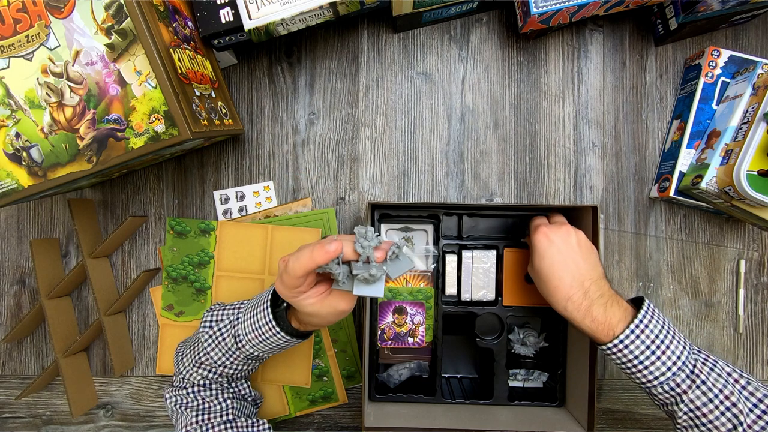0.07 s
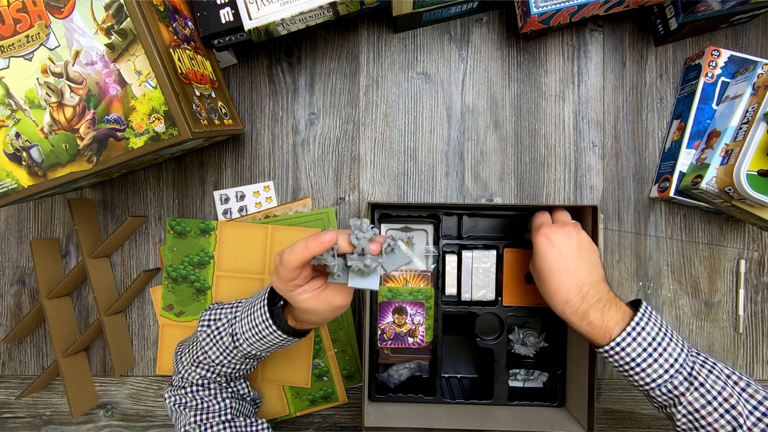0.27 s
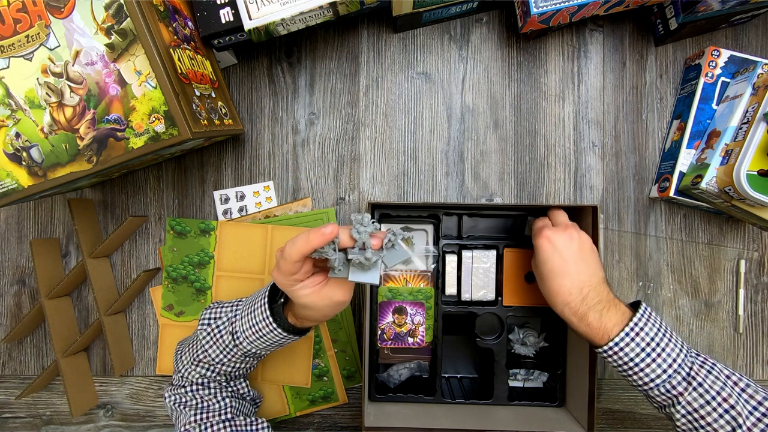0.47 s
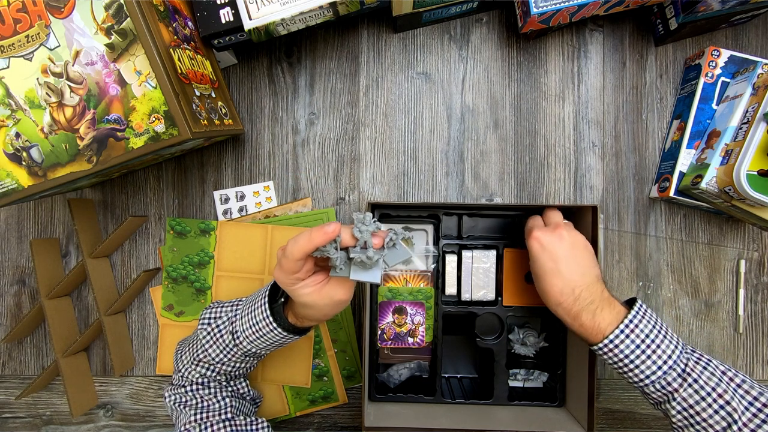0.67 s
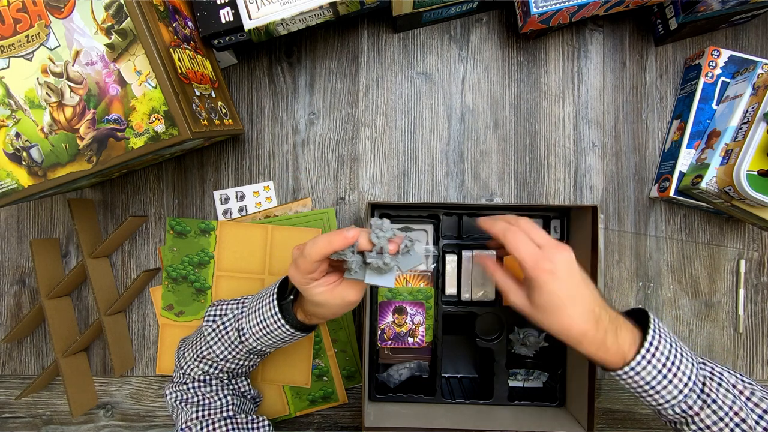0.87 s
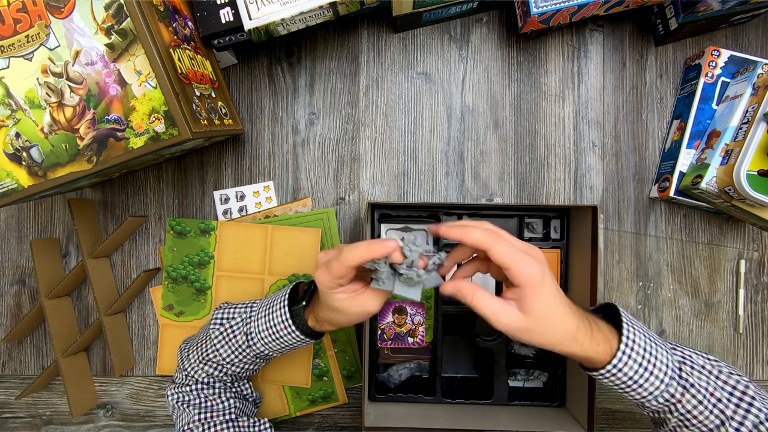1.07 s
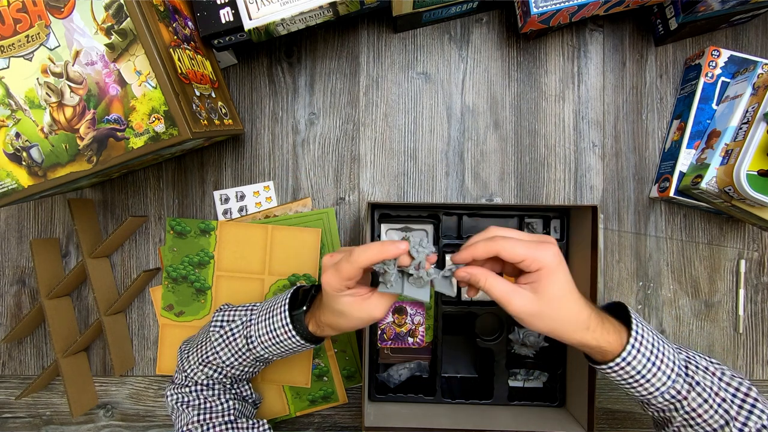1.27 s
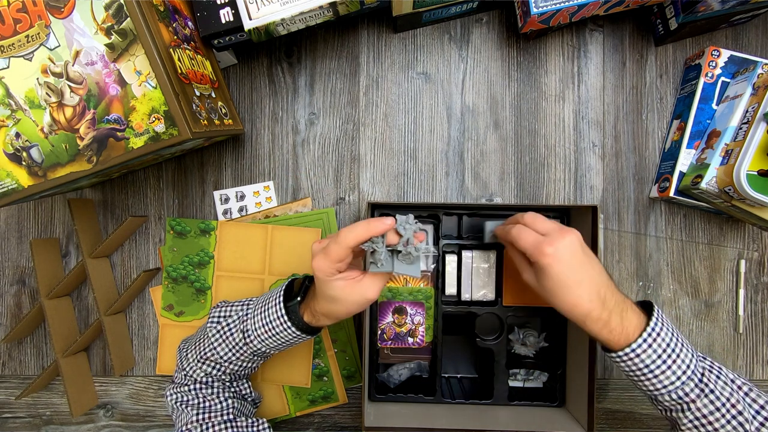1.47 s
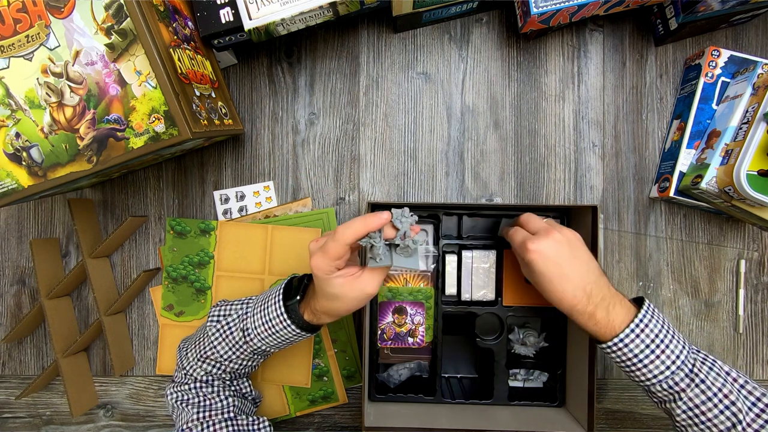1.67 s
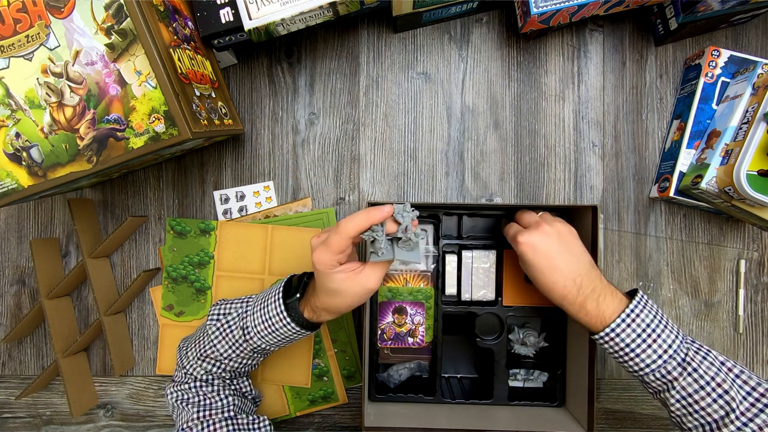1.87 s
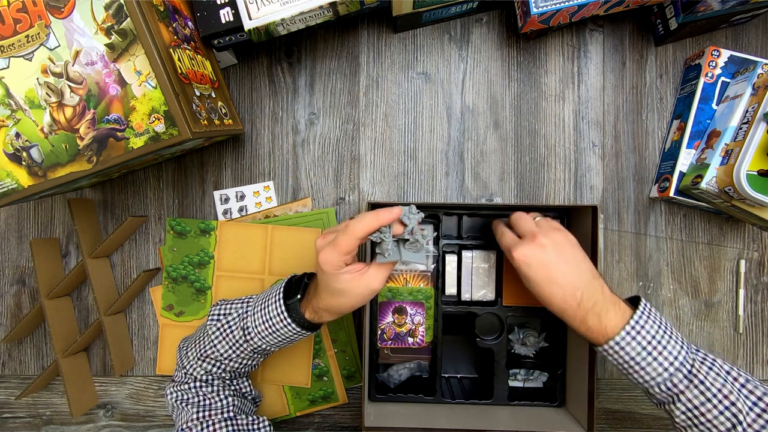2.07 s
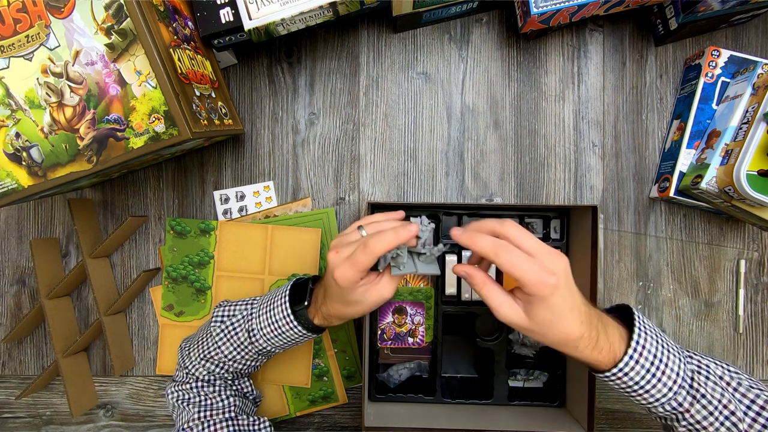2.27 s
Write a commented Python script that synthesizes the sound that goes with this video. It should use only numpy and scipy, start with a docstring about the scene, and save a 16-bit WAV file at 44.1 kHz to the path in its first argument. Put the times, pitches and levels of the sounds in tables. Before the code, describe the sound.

Small plastic figures clatter in a thin plastic box insert. Faint sliding starts it, then dry ticks and scrapes from 0.2 s build to two loudest, hollow knocks near 0.56 and 0.6 s, fading by 0.7 s. Near quiet follows, with a barely audible rub at 1.15 s. Lighter clicks resume at 1.6 s, with a sharper clack around 1.87 s and tiny scrapes after. Small room, low rumble, soft hiss, faint intermittent high whine.

```python
"""On a table in a small room, small plastic figures are set down into a cardboard box's thin plastic insert.
Each touch is a sharp tick: noise bands ring as the insert's walls, tuned modes as the box and the room, one
short note as the part touched. Slides of a piece or a finger are runs of tiny contacts. Two clusters of clatter
reach the microphone, the ticks and notes with a short room tail, over low rumble, hiss and a faint whine
that comes and goes, almost in mono."""
import sys
import numpy as np
from scipy import signal
from scipy.fft import rfft, irfft
from scipy.io import wavfile
from scipy.ndimage import uniform_filter1d

SR = 44100
rng = np.random.default_rng(int(sys.argv[2]) if len(sys.argv) > 2 else 0)


def write(x):
    x = np.atleast_2d(x).T
    wavfile.write(sys.argv[1], SR, np.round(np.clip(x, -1, 1) * 32767).astype(np.int16))


N = 101430
TIME = np.arange(N) / SR
RING_SIZE, TAIL_SIZE = SR // 6, SR * 2 // 3  # longest wall ring and room tail, samples
EDGES_HZ = np.geomspace(100, 17000, 16)  # edges of the noise bands
CUTOFF_HZ = 15800  # top of the sound at the microphone


def from_db(db):
    """Decibels to gain."""
    return 10 ** (np.asarray(db) / 20)


def rms_one(x):
    """Scale to an rms of one."""
    return x / np.sqrt(np.mean(x ** 2) + 1e-20)


def at_hz(points, hz):
    """Read a (f/Hz, value) table on a log-frequency axis."""
    f, v = np.transpose(points)
    return np.interp(np.log(hz), np.log(f), v)


def dying(t60, size):
    """Envelope that falls 60 dB in t60 seconds."""
    return np.exp(-np.log(1000) * TIME[:size] / t60)


def convolve(x, response):
    """Causal convolution, cut to the scene's length."""
    return signal.fftconvolve(x, response)[:N]


def noise_bands(size):
    """Half-octave bands of noise with steady level: (centre Hz, share of the spectrum, noise)."""
    white = rng.standard_normal((2, size + RING_SIZE))
    for k, (low, high) in enumerate(zip(EDGES_HZ, EDGES_HZ[1:])):
        band = signal.butter(2, [low, high], "band", fs=SR, output="sos")
        # neighbouring bands take unrelated noise; the filter's start is dropped
        x = signal.sosfilt(band, white[k % 2])[RING_SIZE:]
        window_s = max(1 / (high - low), 1 / 200)
        power = uniform_filter1d(x ** 2, size=int(SR * window_s))
        yield np.sqrt(low * high), 2 * (high - low) / SR, x / np.sqrt(power + 1e-12)


def coloured_noise(spectrum):
    """Steady noise with the given spectrum; rms 1."""
    hz = np.maximum(np.arange(N // 2 + 1) * SR / N, 1)
    return rms_one(irfft(rfft(rng.standard_normal(N)) * from_db(at_hz(spectrum, hz)), N))


def narrow_noise(hz, width_hz):
    """Noise gathered around one frequency; rms 1."""
    f = np.arange(N // 2 + 1) * SR / N
    return rms_one(irfft(rfft(rng.standard_normal(N)) / (1 + (2 * (f - hz) / width_hz) ** 2), N))


def clicks(s, db):
    """One click at each time."""
    return np.bincount(np.clip(s * SR, 0, N - 1).astype(int), from_db(db), N)


def ring(x, hz, t60):
    """A two-pole resonator: a unit click sets a dying sine of starting height 1 ringing."""
    r, w = np.exp(-np.log(1000) / (t60 * SR)), 2 * np.pi * hz / SR
    return signal.lfilter([0, np.sin(w)], [1, -2 * r * np.cos(w), r * r], x + 1e-18)


# spectrum of the rumble and hiss in the room: f/Hz, relative level/dB [per Hz]
FLOOR_SPECTRUM = [(12, -33), (20, 0.5), (68, -6), (204, -12.5), (285, -16), (513, -21.5), (849, -28),
                  (1000, -28.5), (2260, -33), (2670, -34.5), (11400, -45), (12800, -48.5), (16000, -50)]
# spectrum of the hiss that differs between the ears: f/Hz, relative level/dB [per Hz]
SIDE_SPECTRUM = [(30, 17), (120, 9), (400, 8.5), (1200, -1), (4000, 0), (9000, 7), (15000, 4.5)]
FLOOR_DB, HISS_SIDE_DB = -44, -71  # rms levels


def background():
    """Steady rumble and hiss; a trace of opposite-signed hiss gives width."""
    middle = from_db(FLOOR_DB) * coloured_noise(FLOOR_SPECTRUM)
    side = from_db(HISS_SIDE_DB) * coloured_noise(SIDE_SPECTRUM)
    return middle + side * np.array([[1], [-1]])


# when the thin high whine is heard: t/s, length/s, level/dB
WHINE_TIMES = [(0.008, 0.087, -64), (0.078, 0.11, -69), (0.544, 0.15, -61), (0.843, 0.22, -76),
               (1.2, 0.11, -70), (1.65, 0.069, -61), (1.788, 0.06, -60), (2.043, 0.058, -60.5),
               (2.156, 0.17, -58.5)]
# the whine and the band of hiss below it: f/Hz, width/Hz, relative level/dB
WHINE_BANDS = [(12880, 200, -1.5), (8920, 920, -4.5)]
WHINE_FADE_S = 0.01


def whine():
    """A faint high whine with a band of hiss below it, both narrowed noise, fading in and out."""
    level = 0
    for start, length, db in WHINE_TIMES:
        to_edge = np.minimum(TIME - start, start + length - TIME)
        level = level + from_db(db) * np.clip(to_edge / WHINE_FADE_S, 0, 1)
    return level * sum(from_db(db) * narrow_noise(hz, width) for hz, width, db in WHINE_BANDS)


# how long the small room rings: f/Hz, t60/s
ROOM_DECAY = [(150, 0.54), (500, 0.31), (1500, 0.3), (5000, 0.35), (14000, 0.11)]
# reflections against the direct sound at the microphone: f/Hz, level/dB
ROOM_LEVEL = [(150, -9), (500, -1), (1500, -2), (5000, -1.5), (14000, -3)]
ROOM_ONSET_S, ROOM_BUILD_S = 0.0012, 0.0087  # delay after the direct sound, then time to full strength


def room(x):
    """Reflections build up within milliseconds and die away band by band."""
    tail, build = 0, np.clip((TIME[:TAIL_SIZE] - ROOM_ONSET_S) / ROOM_BUILD_S, 0, 1)
    for hz, share, noise in noise_bands(TAIL_SIZE):
        shape = dying(at_hz(ROOM_DECAY, hz), TAIL_SIZE) * build
        level = from_db(at_hz(ROOM_LEVEL, hz)) * np.sqrt(share / np.sum(shape ** 2))
        tail = tail + level * noise * shape
    return convolve(x, tail)


# centres of the four contact bands, bass, middle, treble, top: f/Hz
CONTACT_BANDS_HZ = [380, 1300, 4000, 10000]


def force(contacts, hz, scatter_db=0):
    """One click per contact, as strong as its colour is at this frequency."""
    # share of each of the four bands at this frequency
    weights = [np.interp(np.log(hz), np.log(CONTACT_BANDS_HZ), row) for row in np.eye(len(CONTACT_BANDS_HZ))]
    chance_db = scatter_db * rng.standard_normal(len(contacts))
    return clicks(contacts[:, 0], contacts[:, 1:-2] @ weights + chance_db)


LOW_CUT_HZ = 168  # low cut of the hollow ring and the notes


def low_cut(x):
    """Take the deep bass out of the ringing."""
    return signal.sosfilt(signal.butter(2, LOW_CUT_HZ, "high", fs=SR, output="sos"), x)


# ringing modes of the box and the room: f/Hz, relative level/dB, t60/s
HOLLOW_MODES = [(223, -10.5, .28), (270.5, -7.5, .18), (322, -7, .18), (391.3, -1, 0.26), (439, -6.5, 0.16),
                (532.3, -5, 0.29), (580.5, -11.5, .18), (631, -2.5, .3), (742, -7.5, 0.19), (814, -5, 0.17),
                (1048, -11, 0.21), (1115, -10, 0.23), (1140, -7.5, 0.27), (1349, -10, 0.23),
                (1400, -10.5, 0.2), (1484, -7, 0.18), (1728, -7, 0.21), (2930, -6, .09)]
MODES_DB, MODES_SCATTER_DB = -7, 2.5  # gain on all modes; spread from contact to contact


def hollow_ring(contacts):
    """The longer ring of box and room; each contact strikes each mode a little differently."""
    out = 0
    for k, (hz, db, t60) in enumerate(HOLLOW_MODES):
        struck = force(contacts, hz, MODES_SCATTER_DB)
        out = out + (-1) ** k * from_db(MODES_DB + db) * ring(struck, hz, t60)
    return out


# strength of the thin walls' dense, short ring: f/Hz, level/dB
WALL_LEVEL = [(120, -29), (190, -15.5), (300, -5), (600, -6.5), (1100, -5.5), (1600, -6.5), (2300, -5.5),
              (3300, -5), (5500, -4), (8000, -1), (11000, -6), (15000, -10)]
# how long the walls ring: f/Hz, t60/s
WALL_DECAY = [(200, 0.16), (1500, 0.087), (5000, 0.081), (14000, 0.045)]
# the walls take a moment to swing up: f/Hz, rise/s
WALL_RISE = [(300, 0.0015), (1500, 0.0013), (6000, 0.0014), (14000, 0.0012)]
TICK_DB, TICK_S = 0, 0.003  # the crack of contact: level against the walls' ring, and length


def walls(contacts):
    """A crack and a dense, quickly dying ring made of noise bands; the lows start more softly."""
    out, t = 0, TIME[:RING_SIZE]
    for hz, _, noise in noise_bands(N):
        tail = dying(at_hz(WALL_DECAY, hz), RING_SIZE) ** 2
        crack = from_db(TICK_DB) ** 2 * np.exp(-(t / TICK_S) ** 2)
        rise = np.minimum(t / at_hz(WALL_RISE, hz), 1)
        # the powers of overlapping contacts add
        power = convolve(force(contacts, hz) ** 2, (tail + crack) * rise ** 2)
        sound = np.sqrt(np.maximum(power, 1e-20)) * noise
        soften = signal.butter(2, min(2 * hz, CUTOFF_HZ), fs=SR, output="sos")
        out = out + from_db(at_hz(WALL_LEVEL, hz)) * signal.sosfilt(soften, sound)
    return out


NOTE_T60_S, NOTE_DAMPING = 0.087, 0.83  # ring time at 1 kHz; higher notes die sooner by this power


def notes(contacts):
    """The part that is touched rings briefly at a note of its own."""
    out = 0
    for hz in dict.fromkeys(contacts[:, -2]):
        own = contacts[contacts[:, -2] == hz]
        t60 = NOTE_T60_S * (1000 / hz) ** NOTE_DAMPING
        out = out + ring(clicks(own[:, 0], own[:, -1]), hz, t60)
    return out


# a piece or a finger slides along a wall: t/s, length/s, bass, middle, treble and top level/dB
# (before SLIDE_DB), centre note of the rubbed part f/Hz, its level/dB (before SLIDE_DB)
WALL_SLIDES = [(0.000, 0.060, -49.5, -49.5, -54.5, -60, 1340, -46),
               (0.101, 0.034, -35.5, -35.5, -52.5, -52.5, 599, -39),
               (0.110, 0.2, -61, -47, -52.5, -61.5, 6900, -53),
               (0.221, 0.063, -40, -32, -45, -58, 1680, -37),
               (0.436, 0.095, -37.5, -39.5, -52, -58.5, 710, -59),
               (0.635, 0.032, -32.5, -28, -54, -61, 1520, -32.5),
               (1.147, 0.053, -71, -79, -67, -65, 8300, -49.5),
               (1.639, 0.100, -49, -43, -56, -57, 2120, -45),
               (1.979, 0.030, -39, -32.5, -45, -50.5, 1150, -41),
               (2.057, 0.11, -68, -58, -60, -64, 5440, -64)]
SLIPS_PER_S, MOST_SLIPS = 810, 400  # contact rate; limit for one slide
SLIDE_DB, SLIP_SCATTER_DB = -9.5, 2.5  # gain on all slides; spread from slip to slip
NOTE_WANDER = .11  # largest share by which a rubbed note wanders


def slips():
    """Each slide is a swelling and fading run of tiny contacts with a wandering note, in rows like the knocks."""
    rows = []
    for start, length, *colour, note_hz, note_db in WALL_SLIDES:
        count = int(np.clip(length * SLIPS_PER_S, 2, MOST_SLIPS))
        place = (np.arange(count) + rng.random(count)) / count  # 0 to 1 along the slide
        swell_db = 10 * np.log10(np.sin(np.pi * place))
        gain_db = SLIDE_DB + swell_db + SLIP_SCATTER_DB * rng.standard_normal(count)
        hz = note_hz * (1 + NOTE_WANDER * rng.choice([-0.97, -0.52, 0.036, 0.51, 1], count))
        for p, d, f in zip(place, gain_db, hz):
            rows.append((start + p * length, *(np.array(colour) + d), f, note_db + d))
    return rows


# a piece knocks on the insert: t/s, bass, middle, treble and top level/dB,
# note of the struck part f/Hz, its level/dB
INSERT_KNOCKS = [(0.217, -27.5, -24, -33, -47, 236, -27.5), (0.2490, -35, -23.5, -41.5, -43.5, 8300, -38),
                 (0.2664, -36.5, -28, -41, -58, 1170, -29), (0.348, -31, -30, -35.5, -48.5, 7850, -34.5),
                 (0.4285, -33, -33, -47, -49.5, 2106, -36.5), (0.4757, -40, -35, -39.5, -50.5, 4140, -37),
                 (0.5304, -30, -29, -32, -44.5, 2277, -27.5), (0.5330, -32, -41, -59, -47, 4540, -30),
                 (0.5616, -16, -17, -33.5, -38, 409, -17.5), (0.5770, -32, -28, -37, -43, 3190, -29),
                 (0.6028, -17.5, -16.5, -32, -42, 765, -22.5), (0.6355, -34, -27, -36, -51, 1400, -31),
                 (0.6480, -41, -49, -53, -60, 1140, -22.5), (0.6660, -38, -60, -48, -55, 2930, -37),
                 (1.6000, -36.5, -40.5, -48.5, -58, 589, -38.5),
                 (1.7591, -29, -28.5, -39, -46, 308.7, -26.5),
                 (1.8394, -27.5, -30.5, -33.5, -47.5, 4260, -37),
                 (1.8655, -24, -19, -24.5, -35.5, 1622, -26.5), (1.881, -30.5, -25.5, -38, -38.5, 880, -27),
                 (1.9053, -28, -25.5, -67, -46, 1380, -53), (1.9809, -35, -47, -53, -71, 1560, -48)]


def knocks():
    """Each knock is one sharp contact, with a colour and a note of the struck part."""
    return list(INSERT_KNOCKS)


def scene():
    """Knocks and slides ring the walls and notes, with a room tail; the hollow ring is added directly."""
    contacts = np.array(knocks() + slips())
    clatter = walls(contacts) + low_cut(notes(contacts))
    hollow = low_cut(hollow_ring(contacts))
    return background() + whine() + room(clatter) + hollow + clatter


def record(dry):
    """At the microphone the top is cut steeply, by an elliptic low-pass."""
    return signal.sosfilt(signal.ellip(12, .1, 80, CUTOFF_HZ, fs=SR, output="sos"), dry)


dry = scene()
out = record(dry)
write(out)
```